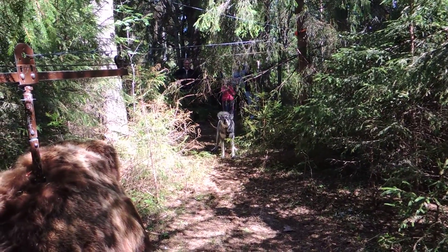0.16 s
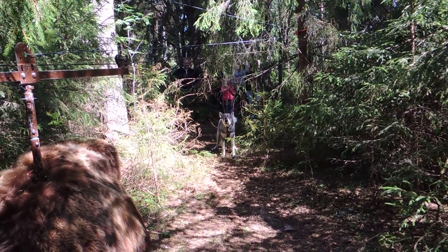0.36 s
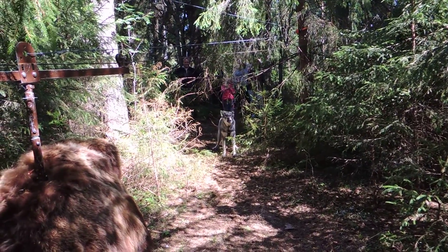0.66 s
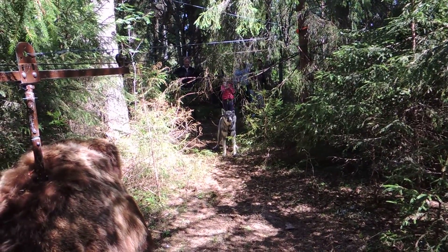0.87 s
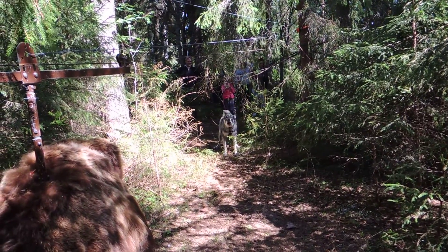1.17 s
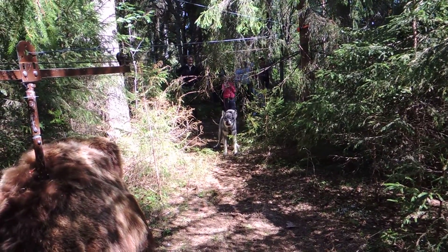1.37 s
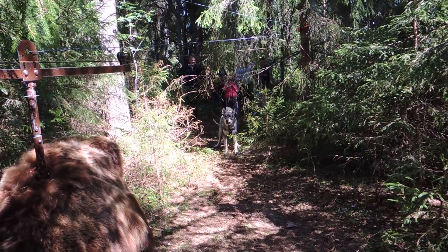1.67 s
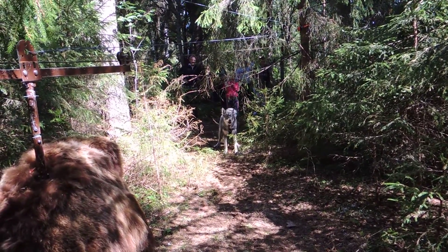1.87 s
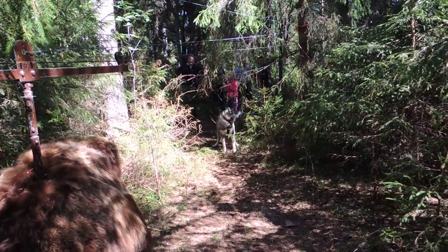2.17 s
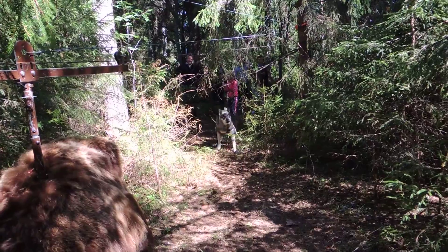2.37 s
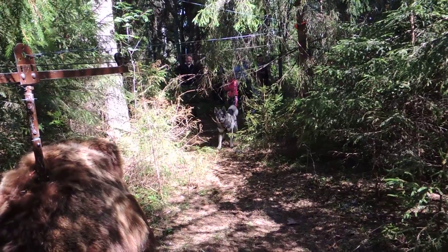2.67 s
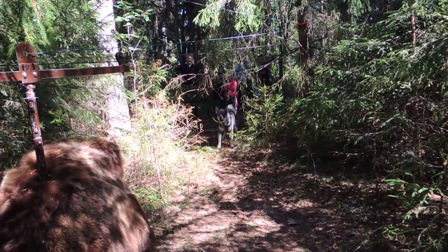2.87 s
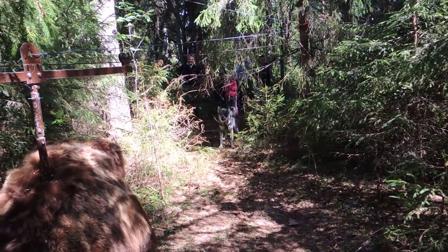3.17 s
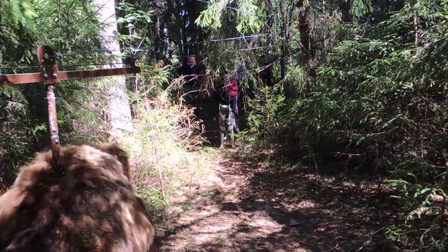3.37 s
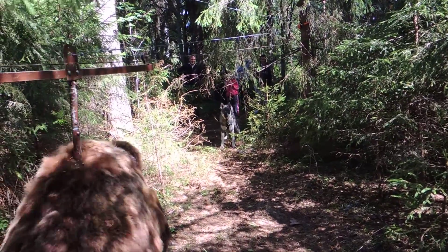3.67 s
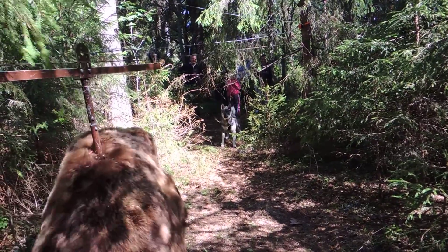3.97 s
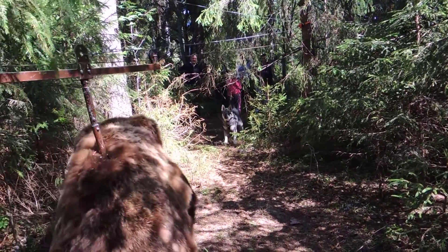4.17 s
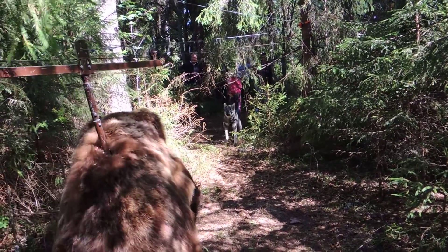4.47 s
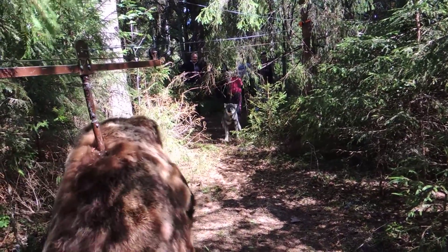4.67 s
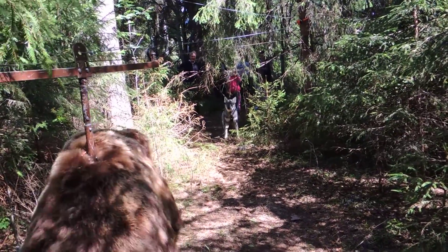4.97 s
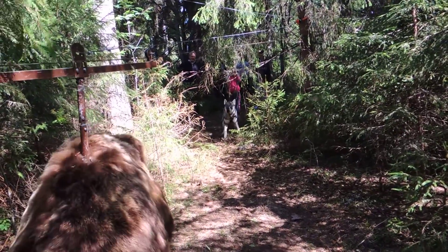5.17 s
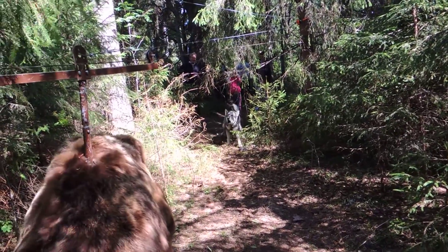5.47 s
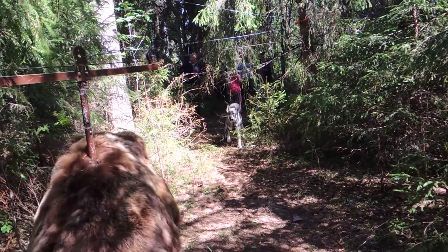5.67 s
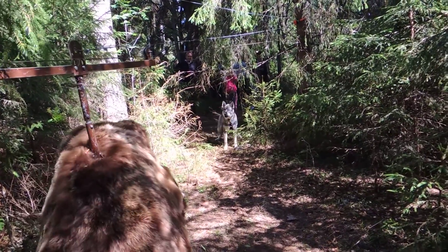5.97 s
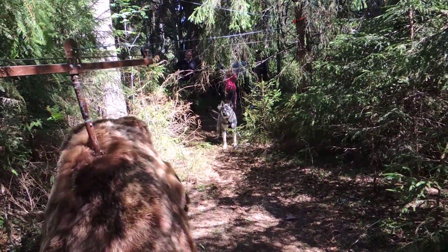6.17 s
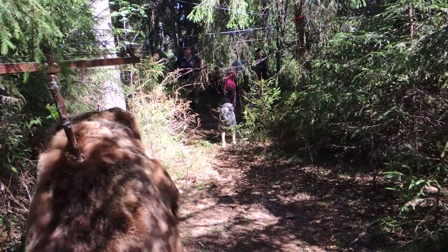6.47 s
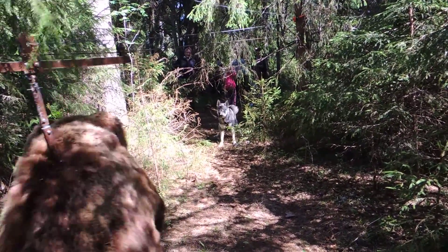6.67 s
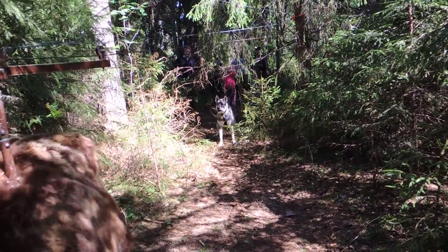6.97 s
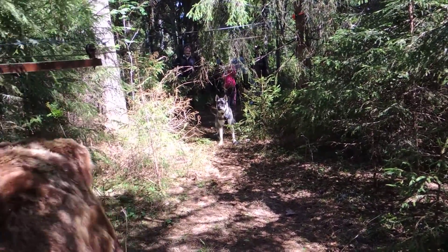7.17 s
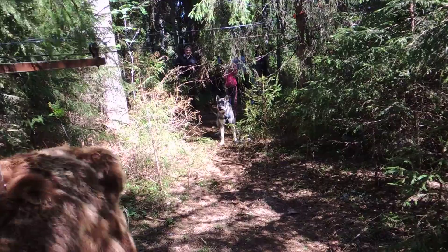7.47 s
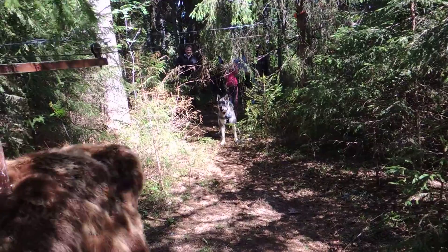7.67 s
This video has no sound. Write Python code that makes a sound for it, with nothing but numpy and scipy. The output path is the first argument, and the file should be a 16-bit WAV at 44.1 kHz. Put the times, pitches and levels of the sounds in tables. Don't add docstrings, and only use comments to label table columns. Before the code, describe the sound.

A medium-pitched, raspy dog bark dominates, each a short push that arches up and falls, scattered back faintly by tree trunks. Between barks, soft rumble and hissing brush continue, with metallic clicks and thin creaks near the microphone, busiest around four, six and seven seconds. Barks come in opening and later quick bursts with single ones between, and the final second is only rustling and a faint creak.

```python
import sys
import numpy as np
from scipy import signal
from scipy.fft import rfft, irfft, next_fast_len
from scipy.io import wavfile
from scipy.ndimage import uniform_filter1d, map_coordinates

SR = 44100
rng = np.random.default_rng(int(sys.argv[2]) if len(sys.argv) > 2 else 0)


def decibels_to_gain(level_db):
    exponent = np.asarray(level_db, float) / 20
    return 10 ** exponent


def inscribe(sig):
    pcm = np.round(np.clip(np.atleast_2d(sig).T, -1, 1) * 32767)
    wavfile.write(sys.argv[1], SR, pcm.astype(np.int16))


N = 344413


def unit(x):
    return x / np.sqrt(np.mean(x ** 2) + 1e-20)


def steady(x):
    return x / np.sqrt(np.abs(uniform_filter1d(x ** 2, size=2600)) + 1e-12)


def along(points, hz):
    f, value = np.transpose(points)
    return np.interp(np.log(hz + 1), np.log(f + 1), value)


def wobble(n, rate):
    knots = rng.standard_normal(int(n * rate / SR) + 4)
    coarse = map_coordinates(knots, [np.arange(n // 16 + 2) * 16 * rate / SR])
    return np.interp(np.arange(n) / 16, np.arange(len(coarse)), coarse)


def filtered(x, response):
    m = next_fast_len(x.shape[-1] + 4096)
    spectrum = rfft(x, m) * response(np.fft.rfftfreq(m, 1 / SR))
    return irfft(spectrum, m)[..., :x.shape[-1]]


def resonance(centre_hz, width_hz):
    return lambda f: 1j * f * width_hz / (centre_hz ** 2 - f * f + 1j * f * width_hz)


# f/Hz, likeness [0-1]
LIKENESS = [(60, 0.73), (240, 0.91), (930, 0.96), (3650, 0.95), (14400, 0.024)]


def rush(spectrum):
    def shape(hz):
        turn = np.arccos(np.clip(along(LIKENESS, hz), -1, 1)) / 2
        return decibels_to_gain(along(spectrum, hz)) * [np.cos(turn), np.sin(turn)]

    mid, side = filtered(rng.standard_normal((2, N)), shape)
    return unit(np.array([mid + side, mid - side]))


def twigs(count):
    when, pitch, size = rng.random((count, 3)).T
    sample = np.arange(200)
    t = sample / SR
    hz = 1900 * 4.5 ** pitch[:, None]
    level = decibels_to_gain(-4 * np.log(size + 1e-4))[:, None]
    grains = level * np.sin(2 * np.pi * hz * t) * np.exp(-t * hz / 5.9)
    place = (when * N).astype(int)[:, None] + sample
    return unit(np.bincount(place.ravel(), grains.ravel(), minlength=N)[:N])


# t/s, length/s, f/Hz, level/dB
SWISHES = [(1.546, 0.057, 10980, -50), (1.946, .08, 11000, -49), (2.528, 0.054, 11000, -43.5),
           (2.629, 0.033, 11000, -53), (2.723, 0.1, 11000, -48), (2.843, .05, 10000, -52),
           (3.42, 0.81, 117, -55), (4.055, 0.031, 9400, -35.5), (4.108, 0.079, 3970, -38),
           (4.187, 0.1, 198, -37.5), (4.39, 0.043, 60.2, -29), (4.57, 0.063, 130, -36),
           (4.86, 0.15, 129.9, -39), (5.12, 0.12, 117.2, -42), (6.217, 0.026, 8000, -42),
           (6.275, 0.08, 3940, -36.5), (6.378, 0.06, 4000, -31.5), (6.478, 0.03, 60, -29),
           (6.914, 0.056, 2740, -41), (7.08, 0.065, 2600, -33), (7.121, 0.071, 3200, -42),
           (7.205, 0.045, 5000, -37), (7.217, 0.091, 2150, -36.5), (7.2, 0.17, 111, -40.5),
           (7.588, 0.066, 11000, -39.5), (7.603, 0.15, 800, -40)]
# f/Hz, width/Hz
STEEL = [(2000, 250), (2900, 300), (4300, 400), (5600, 450), (9500, 900)]


def swishes():
    out = np.zeros((2, N + SR))
    steel = lambda f: .3 + sum(1 / (1 + (2 * (f - c) / w) ** 2) for c, w in STEEL)
    for s, length, hz, db in SWISHES:
        u = np.arange(round(length * SR)) / (length * SR)
        noise = rng.standard_normal((2, len(u))) * decibels_to_gain(2.8 * wobble(len(u), 146))
        noise = noise[0] + hz / 20000 * np.array([noise[1], -noise[1]])
        octave = lambda f: np.exp(-(np.log2((f + 1) / hz) / 0.91) ** 2)
        puff = unit(filtered(noise, lambda f: octave(f) * steel(f)))
        swell = np.sin(np.pi * u ** .35)
        out[:, round(s * SR):][:, :len(u)] += decibels_to_gain(db) * swell * puff
    return out[:, :N]


# f/Hz, level/dB per Hz
HUM = [(88, -56), (150, -13.5), (216, -6), (693, -5), (798, -5.5), (1030, -8), (1280, -17.5), (2500, -21),
       (3250, -43), (5500, -120)]
# f/Hz, level/dB per Hz
RUMBLE = [(10, -14), (25, -1), (60, 0), (150, -2.5), (260, -15), (500, -120)]
# f/Hz, level/dB per Hz
RUSTLE = [(710, -27), (1200, 2.5), (1530, -3), (2300, -2.5), (12500, -4.5), (14300, -9.5), (14800, -29)]
# t/s, level/dB
SWEEP = [(0, -46.5), (.45, -41.5), (.8, -45.5), (1.3, -40.5), (1.7, -44.5), (2.1, -40), (2.55, -42.5),
         (3.35, -44), (3.7, -42.5), (4, -37), (4.3, -40.5), (4.6, -44.5), (5.8, -42.5), (6.05, -44.5),
         (6.42, -32.5), (6.75, -43.5), (7.25, -38), (7.81, -39.5)]


def forest():
    rustle_db = np.interp(np.arange(N) / SR, *np.transpose(SWEEP))
    stir_db = rustle_db + 42
    hum = decibels_to_gain(-45.5 + 0.5 * stir_db + 0.22 * wobble(N, 2.3)) * rush(HUM)
    rumble = decibels_to_gain(-53.5 + .7 * stir_db + 1.1 * wobble(N, 45)) * rush(RUMBLE)

    sweep = np.clip((rustle_db + 47.5) / 9, 0, 1)
    leaves = rush(RUSTLE)
    dull = signal.lfilter(*signal.butter(2, .3), leaves)
    leaves = dull + (0.47 + 0.48 * sweep) * (leaves - dull)
    flutter = decibels_to_gain(1.1 * wobble(N, 14))
    brush = decibels_to_gain(rustle_db) * (flutter * leaves + 0.24 * sweep ** 2 * twigs(count=4000))
    return hum + rumble + swishes() + brush


# t/s, peak level/dB, f/Hz, crack over peak level/dB
TICKS = [(2.4607, -23.5, 6700, -4), (2.9931, -12.5, 2570, -5), (3.451, -23, 1990, -15),
         (3.5207, -31, 3030, -20), (3.634, -34, 2900, -3), (3.7304, -28.5, 3030, -13),
         (3.8134, -24, 2170, -10), (3.866, -26, 6500, -5), (4.205, -26, 5350, -4), (6.062, -23, 2500, -2),
         (6.236, -28, 2530, -18), (6.371, -20, 2900, -12), (6.392, -16, 2200, -14),
         (6.7067, -41, 3450, -11), (6.7406, -26, 5330, -1), (6.8967, -52, 3005, -3), (6.912, -24, 3090, -9),
         (6.9655, -34, 2300, -3), (7.0473, -26, 9200, -22), (7.078, -28.5, 2030, 4),
         (7.1465, -20.5, 2950, -3.5), (7.199, -23, 2880, -21)]
# t/s, length/s, f/Hz, glide/Hz, level/dB
SQUEAKS = [
    (3.338, 0.045, 3160, -73, -36),
    (4.019, 0.1, 1985, 5, -27.5),
    (4.103, 0.057, 3000, 3, -38),
    (6.27, 0.023, 2130, 0, -31),
    (6.275, 0.039, 1940, -5, -30.5),
    (6.698, 0.047, 3440, -250, -44),
    (7.617, .05, 2320, 0, -43),
]


def arm():
    out, t = np.zeros((2, N + SR)), np.arange(SR // 20) / SR
    for s, db, hz, top_db in TICKS:
        ring = np.sin(2 * np.pi * hz * t) + .6 * np.sin(2 * np.pi * 1.7 * hz * t)
        ring = ring * decibels_to_gain(-60 * t / .009)
        crack = rng.standard_normal((2, len(t))) * decibels_to_gain(-60 * t / 0.018)
        crack = filtered(crack, lambda f: 1 / (1 + (2000 / (f + 1)) ** 4) / (1 + (f / 12000) ** 2))
        crack = crack[0] + np.array([0.28 * crack[1], -.4 * crack[1]])
        out[:, round(s * SR):][:, :len(t)] += decibels_to_gain(db - 1.5) * (ring + decibels_to_gain(top_db + 8.0) * crack)
    for s, length, hz, glide_hz, db in SQUEAKS:
        u = np.arange(round(length * SR)) / (length * SR)
        swing = 2 * np.pi * np.cumsum(hz + glide_hz * u) / SR + .7 * wobble(len(u), 130)
        swell = decibels_to_gain(db + 1.8 * wobble(len(u), 102)) * np.sin(np.pi * u)
        out[:, round(s * SR):][:, :len(u)] += swell * np.sin(swing)
    return out[:, :N]


# f/Hz, t60/s
TRUNKS = [(200, 0.62), (700, 0.39), (1300, 0.47), (4000, 0.82), (12000, 0.051)]


def trunks(x):
    hz, t, z = signal.stft(rng.standard_normal((2, SR // 2)), SR, nperseg=256)
    fade = decibels_to_gain(-60 * t / along(TRUNKS, hz)[:, None])
    tail = signal.istft(z * fade, SR, nperseg=256)[1]
    tail = tail[0] + np.array([0.051 * tail[1], -.12 * tail[1]])
    late = np.pad(x, (700, 0))[None]
    return signal.fftconvolve(late, tail / np.linalg.norm(tail[0]), axes=1)


# f/Hz, width/Hz, level/dB
NASAL = [(2900, 210, 10.5), (3660, 850, 2), (4540, 400, 6.5), (4960, 150, 12), (5930, 1540, 7.5),
         (7210, 520, 5.5), (8340, 1100, 0), (9680, 1500, -2), (11320, 630, -7), (12600, 1600, -18)]
# f/Hz, level/dB per Hz
BREATH = [(1410, -32), (2400, -8.5), (4030, -10.5), (5800, -11), (9810, -5.5), (13800, 3), (14500, -42),
          (14800, -49)]


def breath(gate, buzz, whistle_hz):
    n = len(gate)
    air = (.9 + gate) * decibels_to_gain(1.5 * wobble(n, 70)) * rng.standard_normal(n) + 1.2 * buzz
    hz, t, z = signal.stft(air, SR, nperseg=512)
    shape = np.full(z.shape, .18)
    for centre_hz, width, db in NASAL + [(whistle_hz, 500, 4)]:
        drift = centre_hz * (1 + .015 * wobble(n, 9)[::256])
        swell = decibels_to_gain(db + 4 * wobble(n, 16)[::256])
        shape[:, :len(drift)] += swell / (1 + (2.6 * (hz[:, None] - drift) / width) ** 4)
    colour = decibels_to_gain(along(BREATH, hz))[:, None]
    return unit(signal.istft(z * shape * colour, SR, nperseg=512)[1][:n])


# t/s, length/s, rasp left [0-1]
CLEAR = [(.2, .035, .1), (.265, .035, .18), (.52, .04, .06), (1.285, .02, .4), (2.29, .11, .4),
         (3.215, .04, .3), (4.745, .085, .1), (5.0, .07, .3), (5.283, .05, .07), (5.56, .055, .08)]


def rasp_at(t, rough):
    slide = .015
    for s, length, left in CLEAR:
        lock = np.clip(np.minimum(t - s + slide, s + length + slide - t) / slide, 0, 1)
        rough = rough + lock * (left - rough)
    return np.clip(rough, 0, .95)


def folds(phase, rasp):
    n = len(phase)
    shaky = phase + (0.057 + 1.066 * rasp) * wobble(n, 170)
    pulses = sum(np.cos(k * shaky) for k in range(2, 14)) * decibels_to_gain(3.9 * rasp * wobble(n, 107.6))
    buzz = (1 - rasp) * sum(np.cos(k * shaky + k * k / 4) for k in range(8, 26)) / 5
    buzz = buzz * decibels_to_gain(0.97 * wobble(n, 44.0))
    gate = np.abs(np.cos(shaky / 2)) ** 3
    grit = unit(filtered(gate * rng.standard_normal(n), lambda f: f < 4200))
    source = np.sqrt(1 - rasp) * unit(pulses) + (.1 + .65 * rasp) * grit
    return source, buzz, gate


def bark(stretch, peak_db, top_hz, low_db, mouth_hz, whistle_hz, air_db, gape_db, palate_db, onset,
         push, breath_db, mouth_db, deepen_db, chest_db, cheek_db, teeth_db, rasp):
    s, effort_db, share = np.transpose(push)
    s = onset + stretch * s
    t = np.arange(s[0], s[-1], 1 / SR)
    n = len(t)
    over = lambda pair: np.interp(t, s[[0, -1]], pair)
    effort_db, share = np.interp(t, s, effort_db), np.interp(t, s, share)
    rasp = rasp_at(t, over(rasp))
    phase = 2 * np.pi * np.cumsum(top_hz * share) / SR
    source, buzz, gate = folds(phase, rasp)

    ring = lambda hz, width: filtered(source, lambda f: resonance(hz, width)(f) ** 2)
    closing = np.clip((t - s[0]) / (s[-1] - s[0]) * 2.12 - .35, 0, 1)
    chest = decibels_to_gain(chest_db) * (ring(418, 111) - 0.24 * ring(568, 110))
    cheek = decibels_to_gain(cheek_db) * (0.047 + 6.3 * (closing - .5) ** 2) * ring(842, 93)
    throat = ring(674, 177.6) + chest - cheek
    upper = decibels_to_gain(palate_db) * closing * ring(1830, 178) - decibels_to_gain(teeth_db) * (1.1 - closing) * ring(2178, 282)
    mouth = steady(ring(mouth_hz, 134) + decibels_to_gain(-8.0) * ring(1178, 335))
    voice = steady(throat + upper) - decibels_to_gain(gape_db + over(mouth_db)) * mouth
    voice = decibels_to_gain(peak_db + effort_db) * voice

    clear_db = peak_db + .8 * effort_db + low_db + over((0, deepen_db)) + 3 * rasp * wobble(n, 60)
    clear = np.sqrt(2) * np.sin(phase + .45 * rasp * wobble(n, 90)) * decibels_to_gain(clear_db)
    hiss_db = peak_db + 0.99 * effort_db + over(breath_db) + air_db
    hiss = decibels_to_gain(hiss_db) * breath(gate, buzz, whistle_hz)
    ribs = lambda f: np.exp(-(np.log2((f + 1) / 157) / 0.81) ** 2)
    thud = decibels_to_gain(peak_db - 36 + 0.19 * effort_db) * unit(filtered(rng.standard_normal(n), ribs))
    edge = np.minimum(1, np.minimum(t - s[0], s[-1] - t) / 0.011)
    return edge * (voice + clear + hiss + thud)


# t/s from the onset, effort level/dB, share of the top pitch
HARD = [(-.045, -50, .5), (-.014, -34, .64), (0, -14, .78), (.025, -2, .95), (.05, -0.5, 0.98),
        (.105, -10, 0.98), (.145, -14.5, .82), (.18, -28, .54), (.24, -57.5, .47)]
ROUND = [(-.055, -47, 0.46), (-.025, -30, 0.52), (0, -15.5, 0.55), (.04, -2, .9), (.07, -1.5, 1),
         (.12, -2.5, 0.92), (.16, -10.5, .8), (.2, -21.5, 0.43), (.27, -44.5, 0.45)]
TIRED = [(-.035, -45, .68), (0, -11.5, .9), (.03, -6.5, 1), (.065, -1, 0.96), (.1, -5.5, .92),
         (.15, -10.5, .72), (.19, -22.5, .57), (.23, -30, .5)]
# its push, levels/dB over the voice, rasp [0-1]; pairs run from first to last moment
WAYS = {"hard": dict(push=HARD, breath_db=(-11.5, -16.5), mouth_db=(-5, -1.5),
        deepen_db=2, chest_db=2.5, cheek_db=-1.5, teeth_db=-11, rasp=(0.94, 0.37)),
        "round": dict(push=ROUND, breath_db=(-15.5, -18.5), mouth_db=(-7.5, -4.5),
        deepen_db=2, chest_db=1.5, cheek_db=-4.5, teeth_db=-19, rasp=(0.8, 0.75)),
        "tired": dict(push=TIRED, breath_db=(-12.5, -17), mouth_db=(-8.5, -1.5),
        deepen_db=7, chest_db=1, cheek_db=-13.5, teeth_db=-17.5, rasp=(0.79, .4))}
# onset t/s, stretch, peak level/dB, top f/Hz, fundamental over voice level/dB, way
BARKS = [(-.15, 1, -19, 345, -14, "round"), (.158, 1, -13, 340, -11, "round"),
         (.478, .98, -10, 340, -13, "round"), (1.244, 1.04, -7, 378, -6, "hard"),
         (2.27, 1.1, -8, 400, -6, "hard"), (3.07, 1, -9, 413, -3, "hard"),
         (4.352, 1.05, -5, 415, -6, "hard"), (4.645, 1.02, -14, 415, -9, "tired"),
         (4.94, .9, -13, 350, -16, "tired"), (5.238, 1.03, -9, 335, -17, "round"),
         (5.526, .95, -12, 333, -15, "round"), (6.45, 1, -5, 405, -7, "hard")]
# mouth f/Hz, extra breath band f/Hz, breath level/dB, mouth level/dB, palate level/dB
TRACT = [(1260, 5200, -1, 0, -6), (1262, 5330, 0, 0.5, -4), (1266, 5300, -2, 1.5, -3),
         (1281, 5350, 0, -2.5, -6.5), (1260, 5230, -4, 1.5, -11), (1324, 3840, -1, 1.5, -6.5),
         (1337, 9050, -0.5, 0, -11.5), (1260, 5200, 0.5, 0, -12), (1232, 4700, -1.5, -0.5, -13),
         (1280, 5830, -3, -3.5, -13), (1299.3, 6000, -0.5, 2.5, -5.5), (1308, 4740, -1, 0.5, -12.5)]


def dog():
    out = np.zeros((2, N + 3 * SR))
    for (onset, *effort, way), tract in zip(BARKS, TRACT):
        call = bark(*effort, *tract, onset, **WAYS[way])
        first = onset + effort[0] * WAYS[way]["push"][0][0]
        start = SR + round(first * SR)
        echo = decibels_to_gain(-20.0) * trunks(call)
        late = np.pad(call, (40, 0))[:len(call)]
        apart = filtered(late, lambda f: 1j * decibels_to_gain(-29) + decibels_to_gain(-5) / (1 + (7500 / (f + 1)) ** 4))
        out[:, start:start + len(call)] += [call + apart, call - apart]
        out[:, start:start + echo.shape[1]] += echo
    return out[:, SR:SR + N]


def scene():
    voice = dog()
    keep = np.exp(-1 / (.3 * SR))
    loud = signal.lfilter([1 - keep], [1, -keep], np.abs(voice[0]))
    return voice + (arm() + forest()) / (1 + 3 * loud)


def roll_off(x):
    return signal.sosfilt(signal.butter(12, 14950, fs=SR, output="sos"), x)


def record(dry):
    heard = filtered(dry, lambda f: f < 14500) * decibels_to_gain([[.2], [-.2]])
    flat = np.clip(heard / (1 + np.abs(heard / 1.03) ** 5) ** (1 / 5), -1, 1)
    return roll_off(flat)


dry = scene()
out = record(dry)
inscribe(out)
```